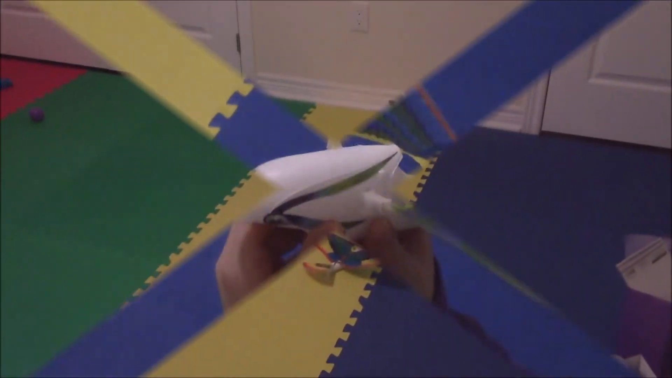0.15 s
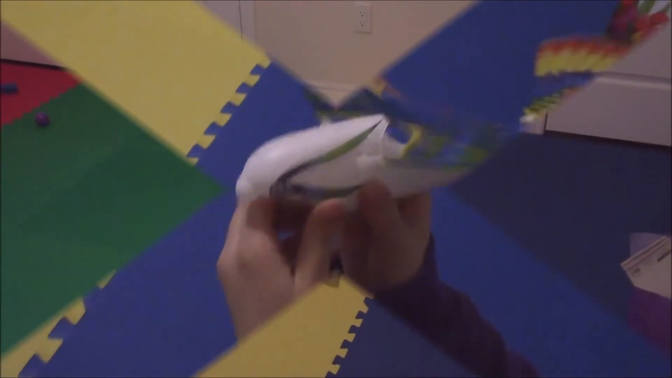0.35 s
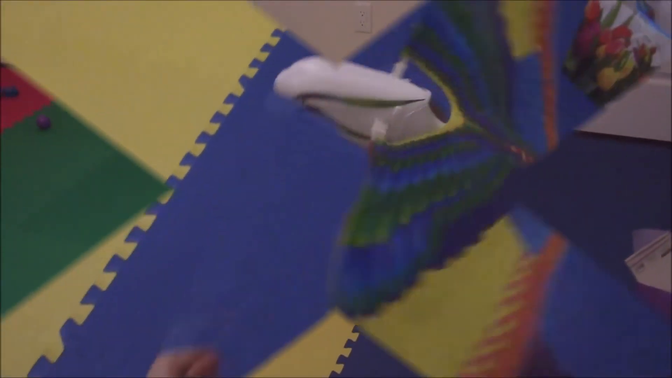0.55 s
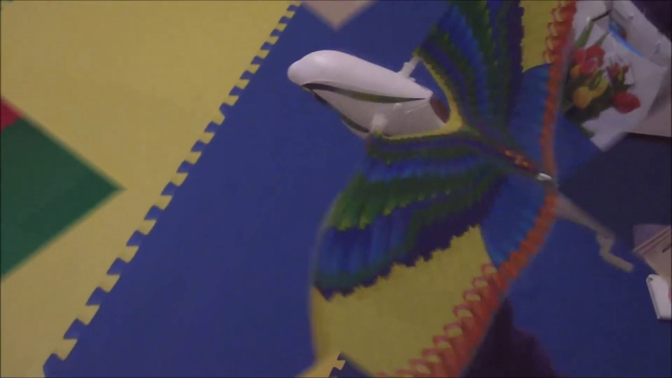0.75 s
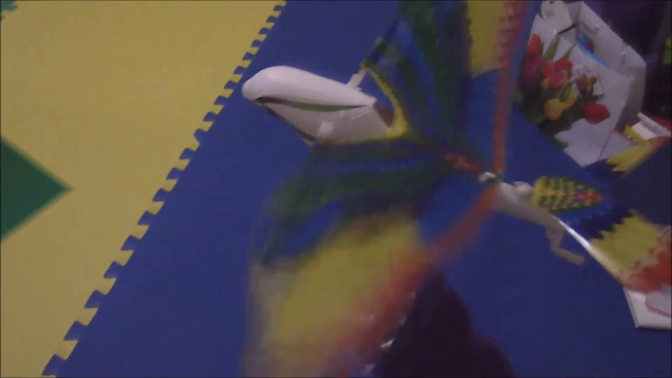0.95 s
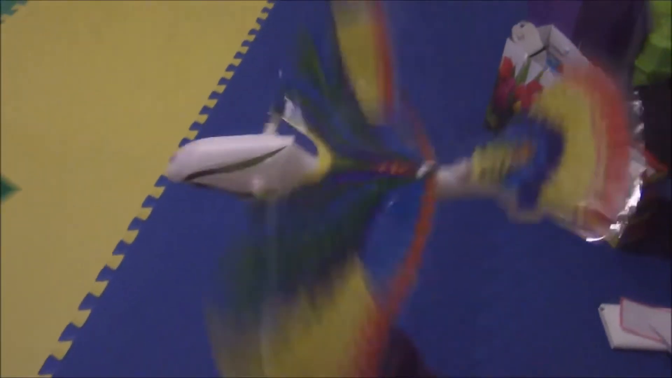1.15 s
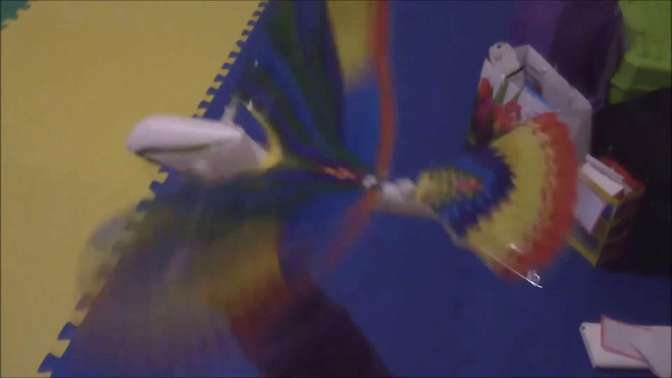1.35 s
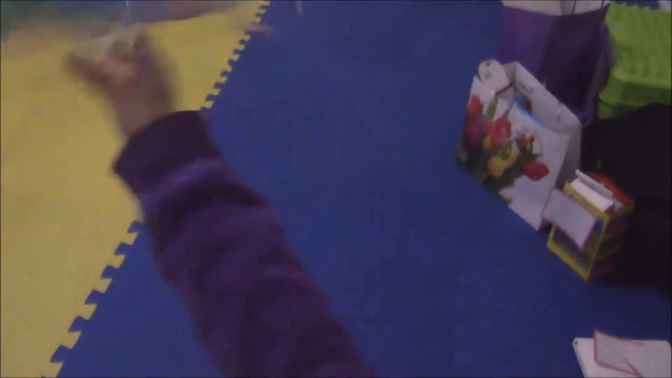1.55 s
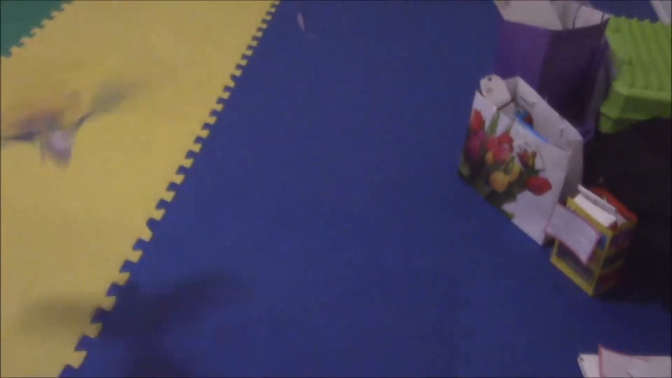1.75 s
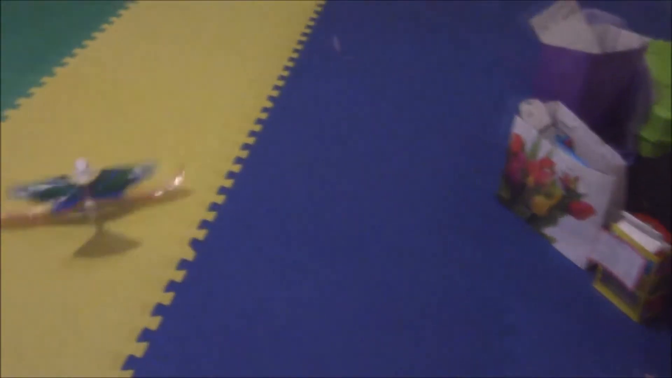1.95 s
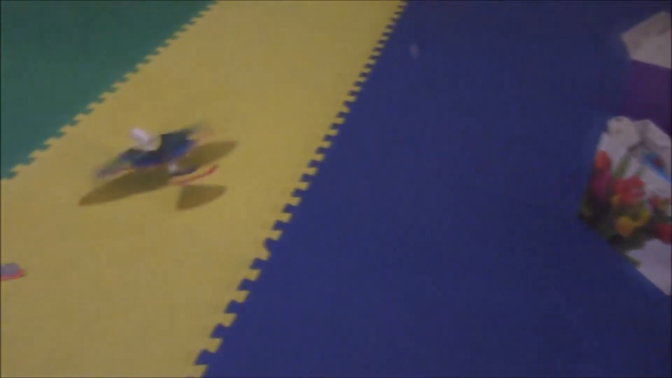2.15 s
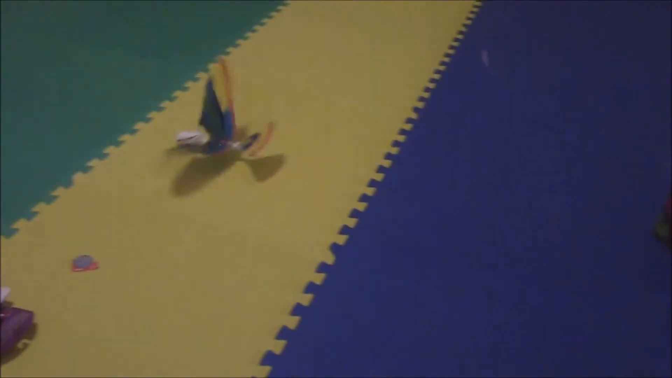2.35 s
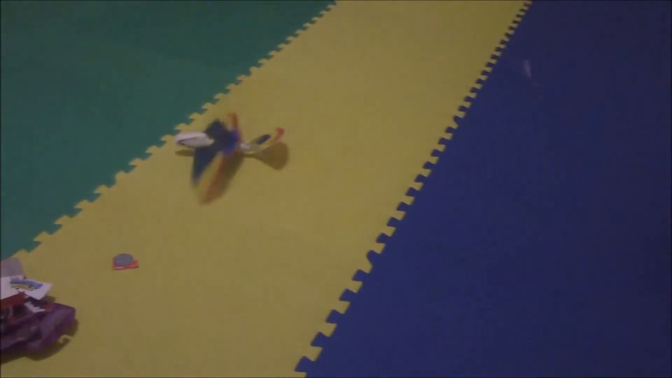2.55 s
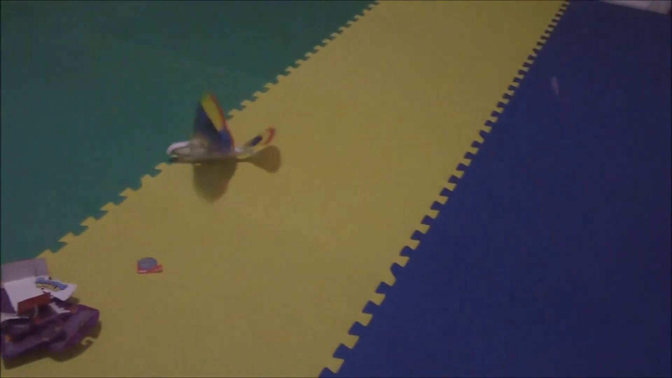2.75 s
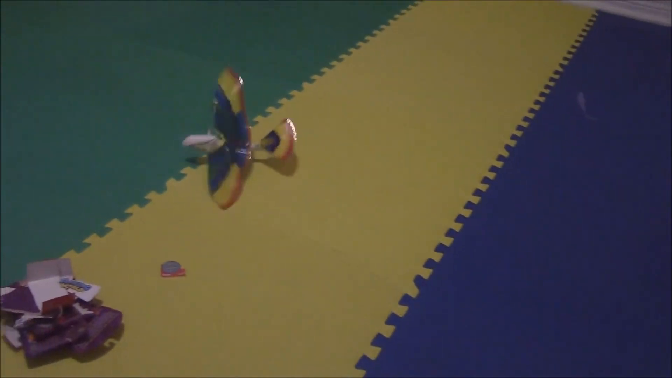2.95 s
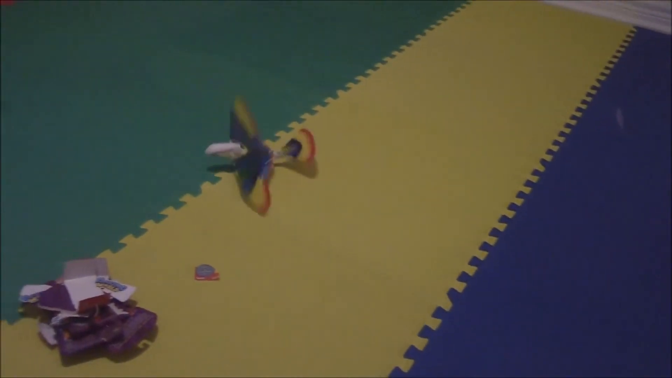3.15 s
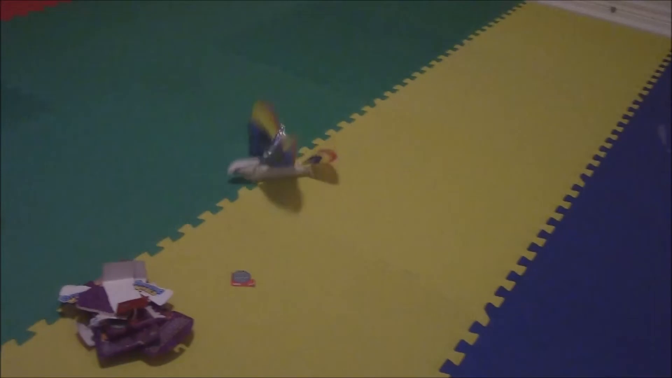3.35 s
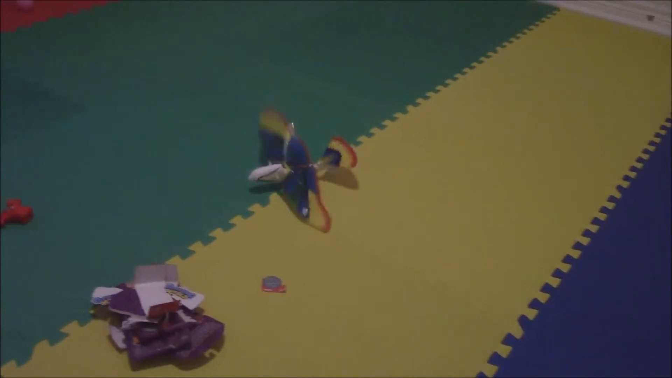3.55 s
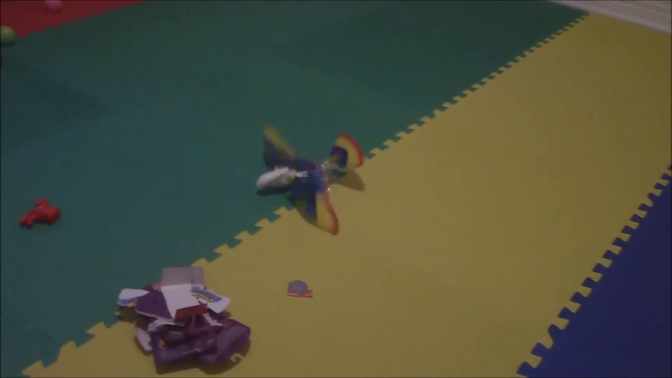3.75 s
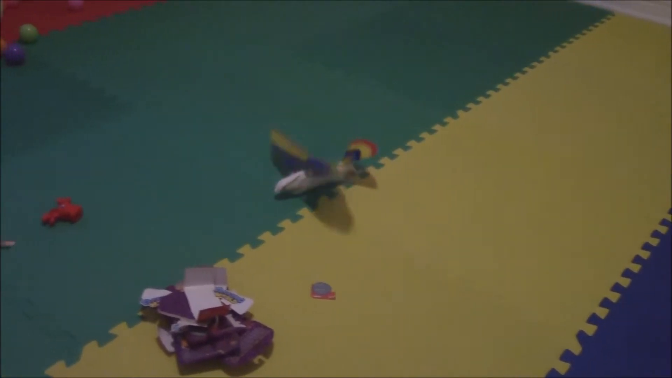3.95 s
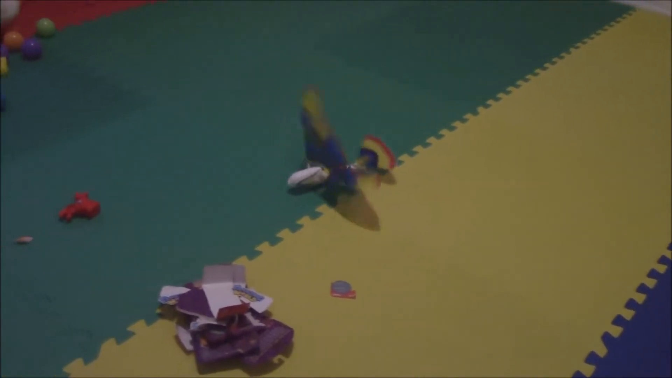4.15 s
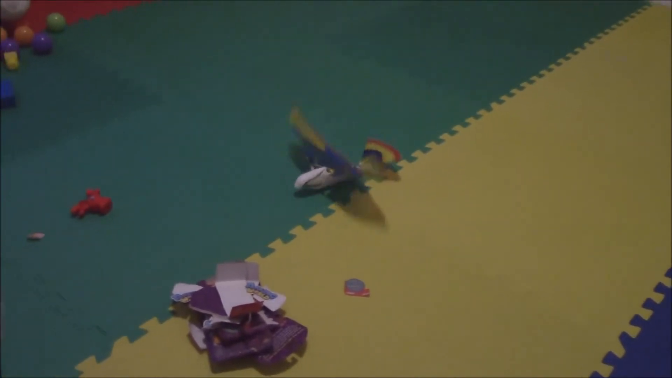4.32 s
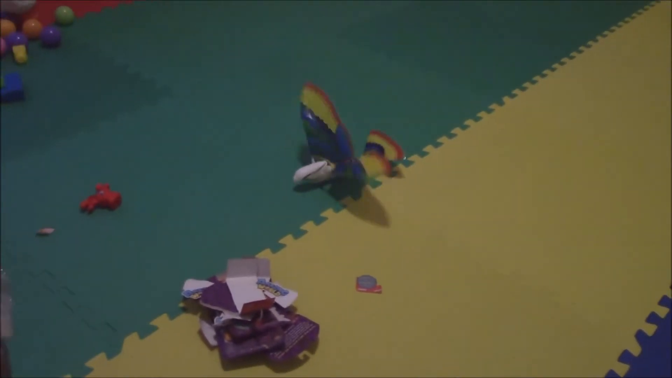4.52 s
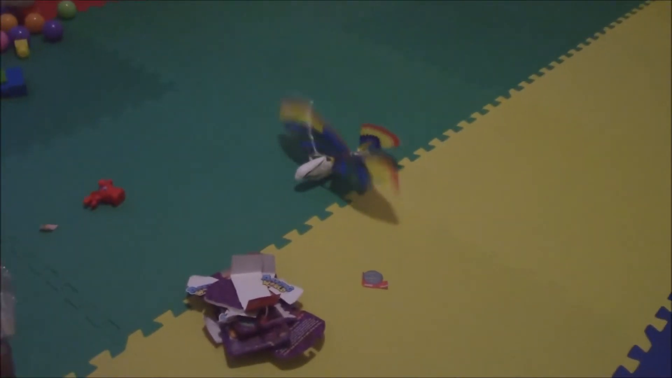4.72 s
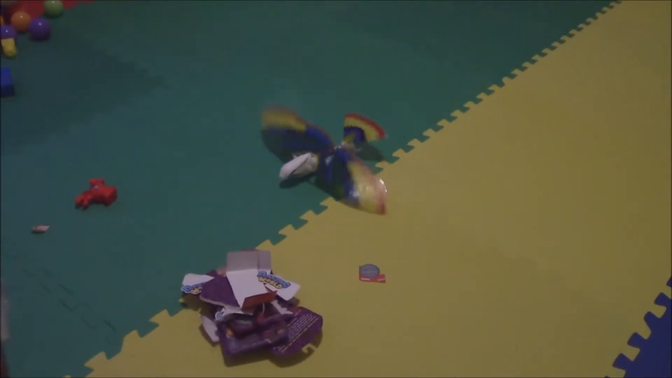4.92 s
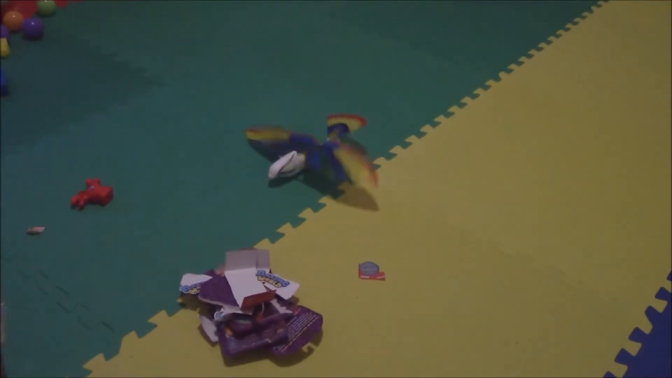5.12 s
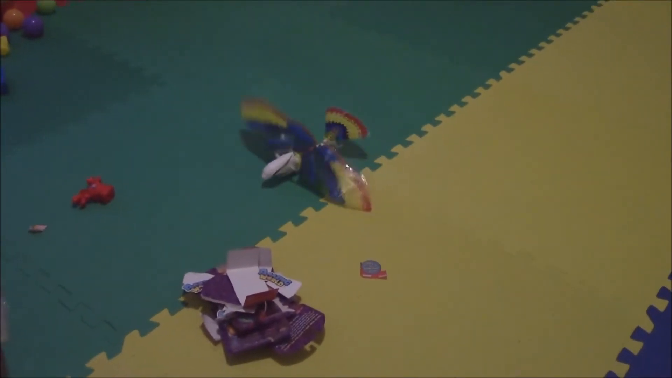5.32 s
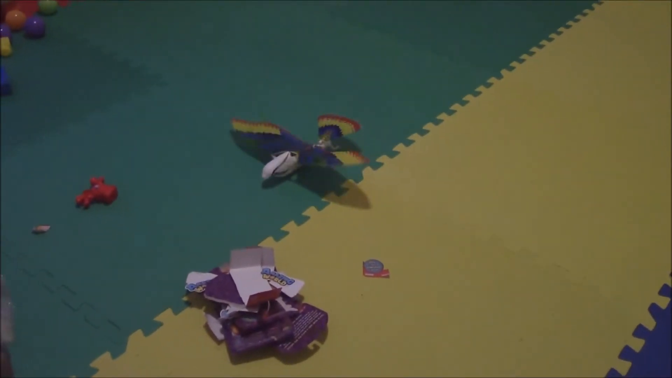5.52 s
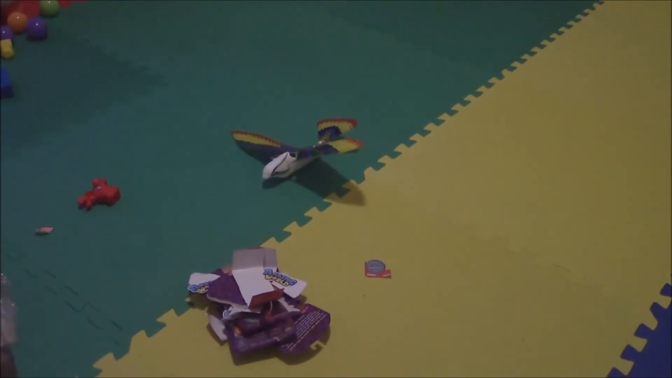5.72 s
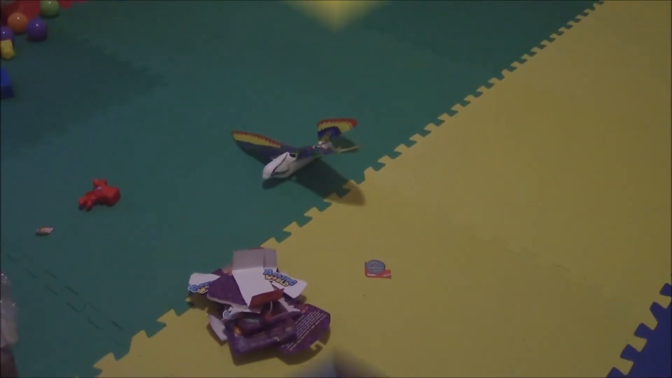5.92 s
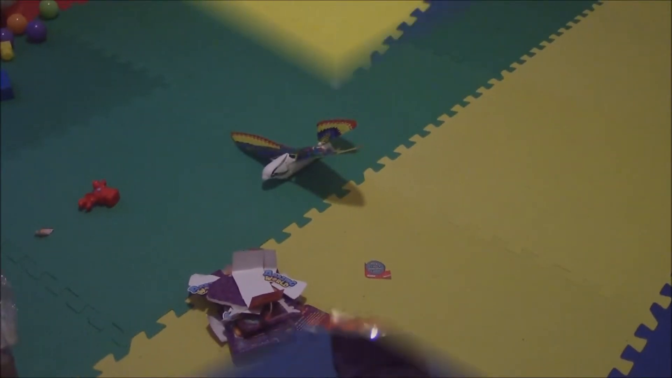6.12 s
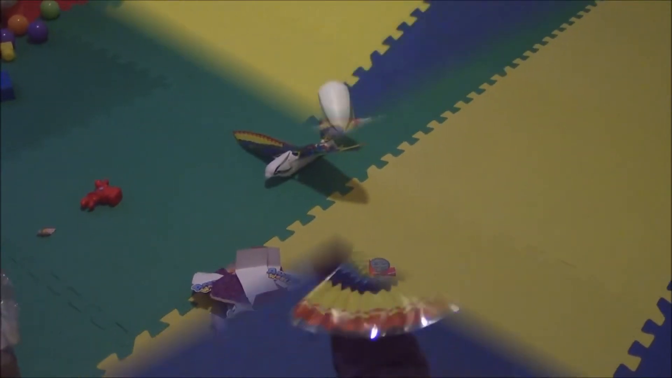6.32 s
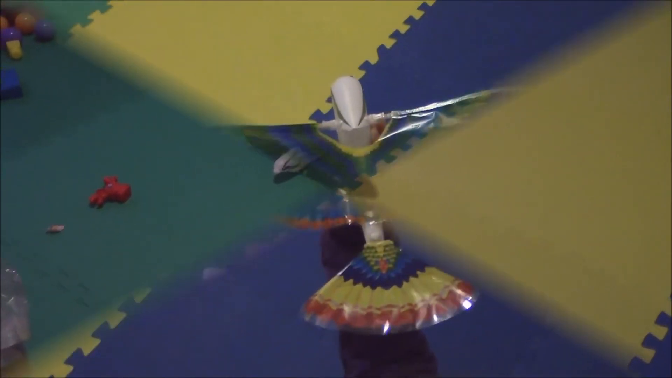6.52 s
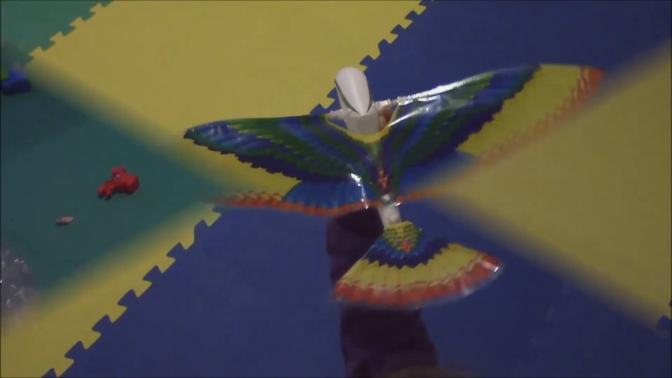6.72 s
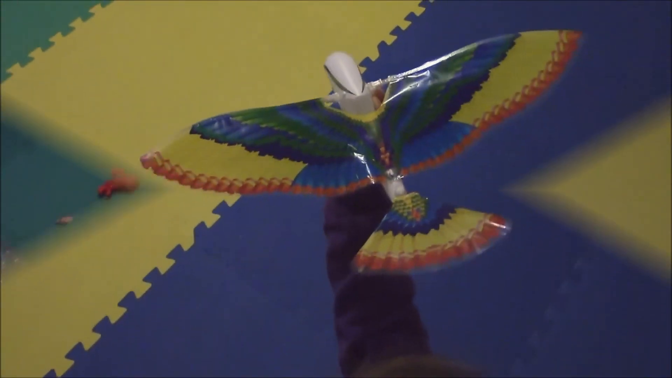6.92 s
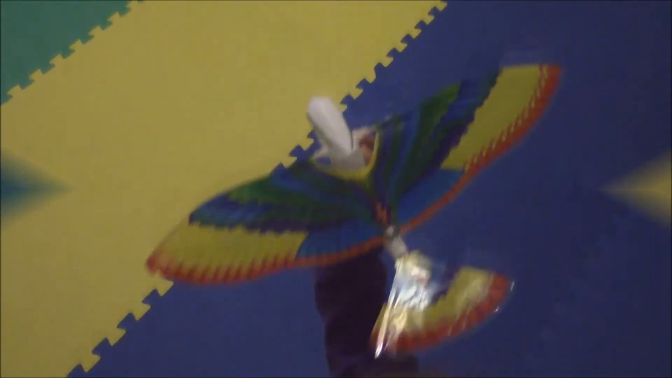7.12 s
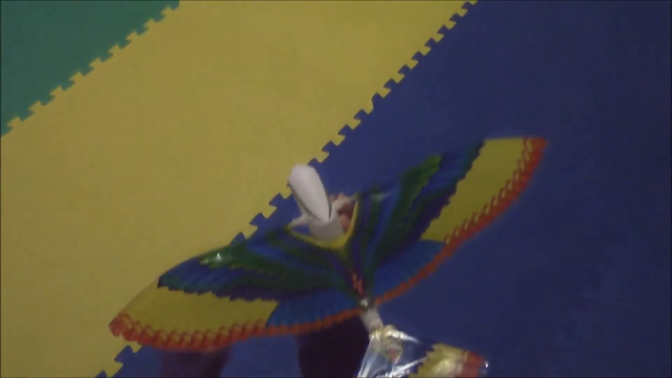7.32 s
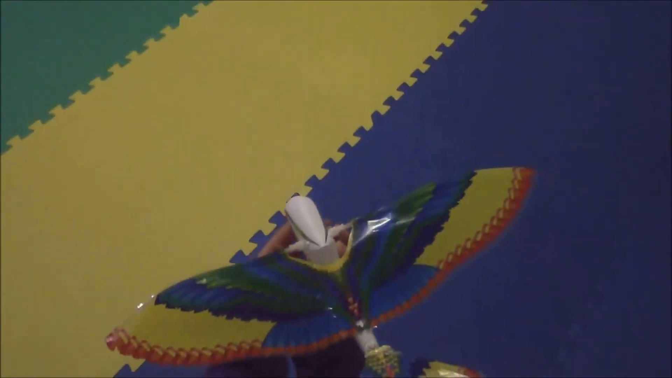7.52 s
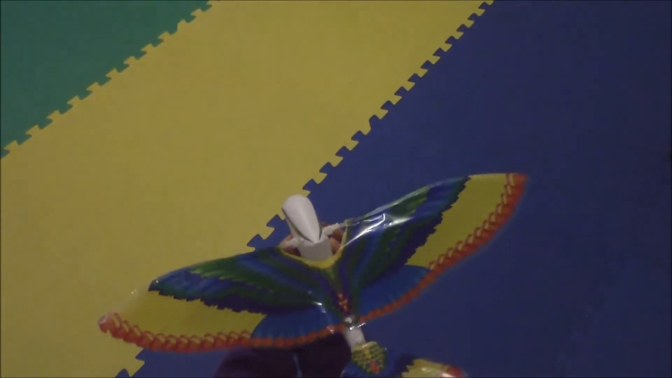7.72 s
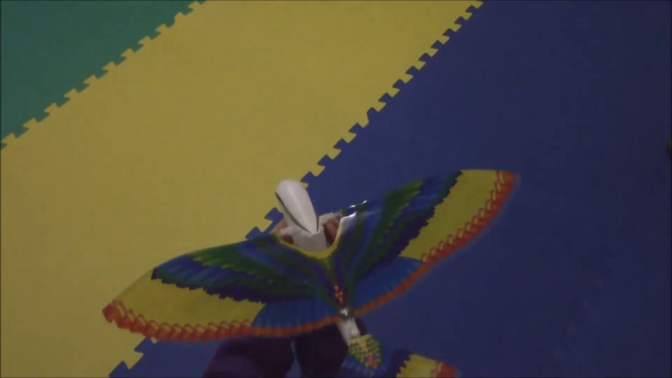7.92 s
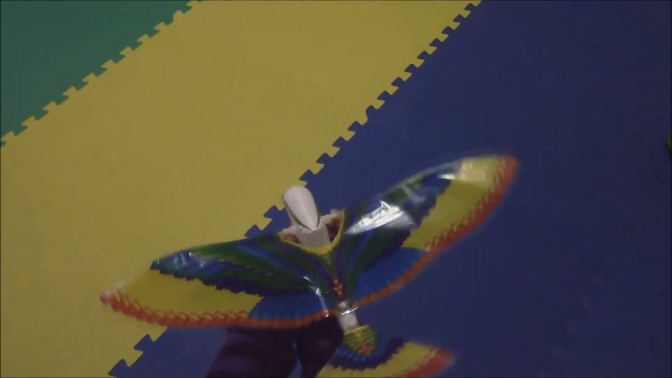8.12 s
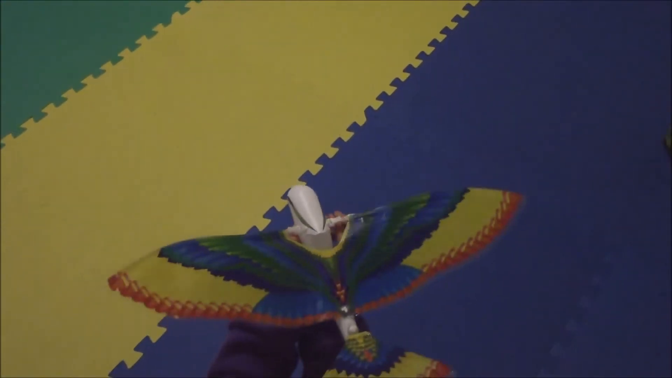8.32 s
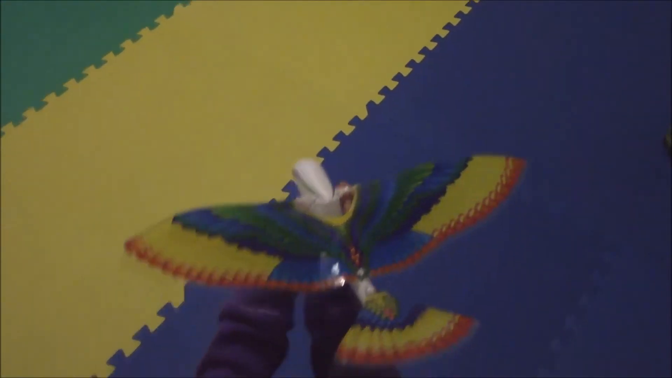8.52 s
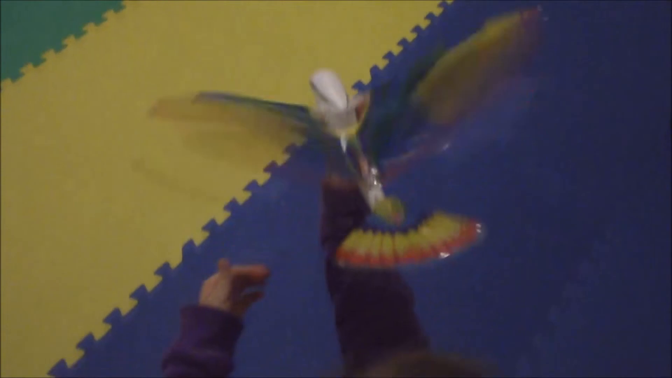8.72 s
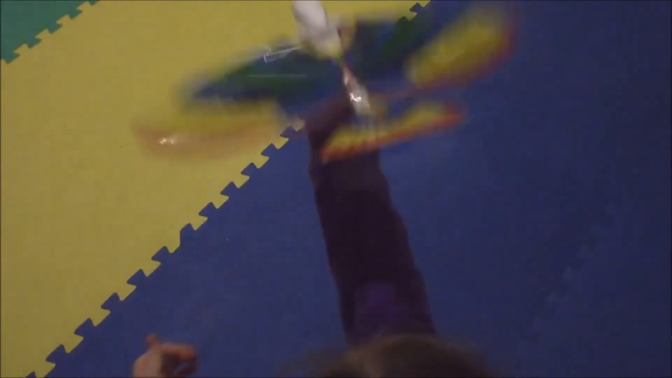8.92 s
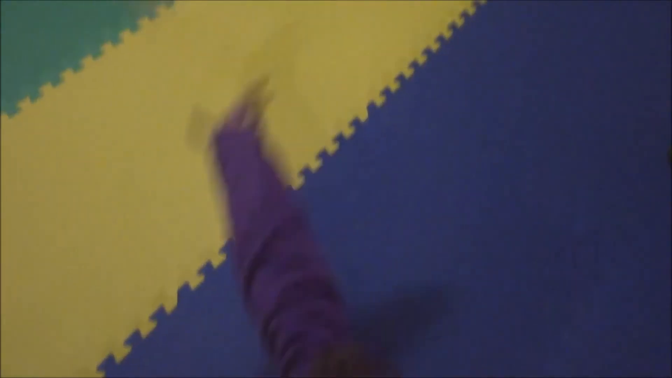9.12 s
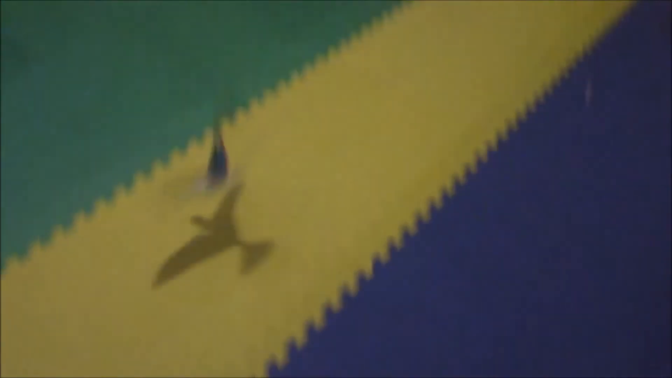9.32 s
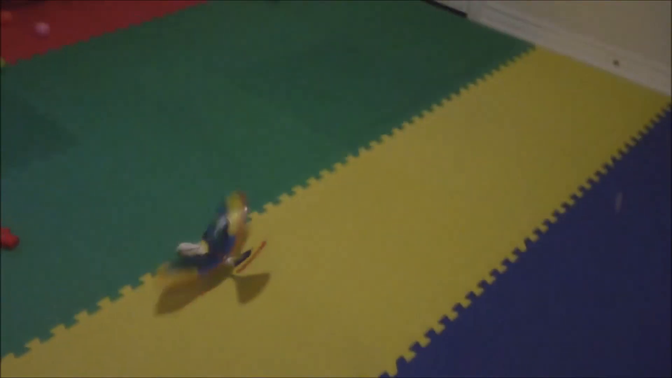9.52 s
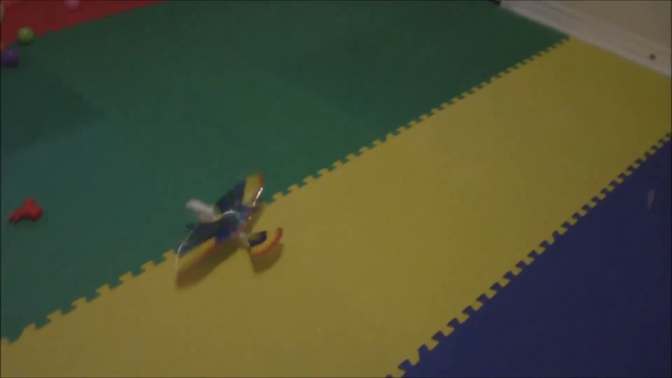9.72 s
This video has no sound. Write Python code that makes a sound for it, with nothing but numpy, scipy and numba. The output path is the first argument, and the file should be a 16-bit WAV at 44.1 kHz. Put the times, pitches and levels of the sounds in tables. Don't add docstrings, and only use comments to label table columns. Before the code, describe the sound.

Plastic film rustles in hand, then a wind-up bird's wings clatter rapidly across a foam mat, slow to a stop, and clatter again.

```python
import sys
import numpy as np
from scipy import signal
from scipy.fft import rfft, irfft
from scipy.io import wavfile
from scipy.ndimage import uniform_filter1d
from numba import njit

SR = 44100
rng = np.random.default_rng(int(sys.argv[2]) if len(sys.argv) > 2 else 0)


def how_loud(loudness_db):
    steps = np.asarray(loudness_db, float) / 20
    return 10 ** steps


def materialize(psi):
    bounded = np.clip(np.atleast_2d(psi).T, -1, 1)
    quanta = np.round(bounded * 32767).astype(np.int16)
    wavfile.write(sys.argv[1], SR, quanta)


N = 434826

# hz, level_db_per_hz
HUM_SPECTRUM = [(15, -53.5), (25, -42.5), (97, -12.5), (185, -2.5), (242, -4), (270, 0), (503, -2.5),
                (641, -3.5), (796, -9.5), (911, -10), (2500, -18), (3000, -15.5), (3500, -21), (9840, -34),
                (16000, -50)]
# start_s, level_db
HUM_LEVEL = [
    (0, -38.5),
    (1.006, -48.5),
    (6.349, -36.5),
    (8.45, -39.5),
    (8.755, -50),
]
# centre_hz, width_hz, level_db
ROOM_MODES = [(146, 11, 2), (236, 11, -1), (303, 14, -3), (354, 11, -1), (425, 11, 1)]
# hz, t60_s
ROOM_T60 = [(100, 0.3), (700, 0.95), (2400, 0.58), (4000, 0.57), (7700, 0.36), (12000, 0.1)]
# hz, side_re_mid_db
STEREO_WIDTH = [(25, 0), (70, -6), (130, -15), (250, -21.5), (600, -23.5), (1290, -20), (2380, -20),
                (4400, -11.5), (8120, -11.5), (15000, -16)]
# centre_s, level_db, spread_s
DRAUGHTS = [
    (1.15, -53, .3),
    (1.7, -64, .4),
    (8.9, -50, .15),
]
# start_s, peak_db, low_mode_db, left_re_right_db, mid_mode_db, landing_s
KNOCKS = [
    (5.913, -26, -9, -5, -1, .0007),
    (6.2628, -8.5, -12, -3, -16, .0002),
    (6.2794, -31, -1, 3, -6, .001),
    (6.5405, -11, -12, 4, -1, .0015),
    (6.5655, -16, 0, 2, -3, .0008),
]
# hz, t60_s
CASE_MODES = [(1550, .016), (2600, .011), (2100, .008), (3150, .01), (4800, .012), (330, .03)]
# start_s, length_s, level_db, pitch_hz
SCRAPES = [(.14, .16, -42, 900), (.255, .05, -43, 1300), (.39, .13, -41, 850), (.55, .14, -42, 900),
           (.55, .03, -44, 1450), (.58, .15, -41, 600), (.865, .03, -43, 950), (8.16, .06, -43, 650),
           (8.27, .15, -42, 750), (7.55, .15, -49, 1500), (8.09, .06, -46, 1700), (8.09, .07, -46, 1100)]
# peak_s, peak_db, rise_20db_s, fall_20db_s
GRIPS = [(.001, -49, .01, .4), (.39, -47, .45, .1), (.418, -31, .025, .1), (.452, -35, .03, .04),
         (.49, -37, .05, .08), (.623, -38, .03, .04), (.655, -33, .06, .03), (.675, -22, .008, .012),
         (.692, -35, .01, .02), (.73, -39, .03, .06), (.81, -45, .018, .12), (6.36, -54, .005, .6),
         (6.6, -54, .03, .55), (7.15, -40.5, .016, .21), (7.35, -43, .011, .08), (7.45, -54, .03, .3),
         (7.93, -42, .15, .09), (8.18, -42, .07, .05), (8.27, -28.5, .045, .08), (8.38, -29, .045, .04),
         (8.415, -33, .03, .05), (8.525, -42, .03, .05), (8.495, -35, .01, .04), (8.62, -40, .013, .016)]
# start_s, end_s, level_db
RESTING = [
    (0, 1, -62),
    (5.62, 5.8, -64),
    (6.35, 8.745, -65),
]
# start_s, peak_db, pitch_hz, fizz_db
TICKS = [(0.0682, -29.5, 2900, -13), (0.159, -24, 1900, -18), (0.2114, -35, 2990, -9.5),
         (0.2384, -28, 3980, -6), (0.2648, -29.5, 3330, -18), (0.2937, -32, 2220, -6),
         (0.3356, -32, 2160, -14), (0.3975, -13, 1520, -18), (0.4184, -21, 2880, 2),
         (0.4489, -15, 7060, -12), (0.4748, -22, 2880, -9), (0.5821, -36.5, 3970, -16),
         (0.5931, -27.5, 2960, -7.5), (0.6205, -22, 3550, -14.5), (0.6414, -22, 3600, -9.5),
         (0.6724, -13.5, 7560, -5), (0.7312, -23.5, 3030, -12), (0.8126, -24.5, 2870, -6),
         (0.8579, -24.5, 2880, -17.5), (0.9353, -37, 1800, -9.5), (0.9547, -34, 3100, -14),
         (0.9737, -50.5, 8000, 14.5)]
# start_s, peak_db, pitch_hz, fizz_db
LATE_TICKS = [(6.5878, -31, 1570, -7), (7.0692, -39, 3340, -16), (7.1453, -38, 1830, -15),
              (7.159, -21, 2010, -16), (7.2513, -35, 1730, -21), (7.2942, -28, 3350, -18),
              (7.3488, -37, 1730, -13), (7.3715, -26, 2650, -13), (7.4534, -33, 2940, -13),
              (7.5174, -31, 1600, -15), (7.596, -28, 1610, -16), (7.7911, -35, 2130, -9),
              (7.8654, -29, 1530, -8), (7.9116, -39, 1580, -9), (7.9273, -31, 2610, 0),
              (7.9807, -32, 1590, -7), (8.1652, -33, 1860, -15), (8.2411, -31, 2860, -12),
              (8.265, -18.5, 3500, -13.5), (8.334, -28, 2100, -9), (8.4082, -30, 2310, -11),
              (8.4944, -18, 6610, -15), (8.558, -30, 3630, -21), (8.6215, -33, 1850, -3)]
# start_s, peak_db, pitch_hz, fizz_db
SETTLE_TICKS = [
    (5.648, -46, 9000, 6),
    (5.685, -58, 9000, 5),
    (5.722, -53, 7000, 5),
    (5.76, -56, 7000, 3),
    (5.906, -58, 9000, 5),
]
# start_s, snap_db, pitch_hz
BOUNCES = [(1.0062, -4, 7800), (1.0103, 0, 1950), (1.04, -8, 3000), (1.2, -9, 2000), (1.676, -8, 3000),
           (2.626, -10, 2200), (8.819, -6, 2500), (8.863, -8, 3000), (9.053, -11, 1660), (9.4142, -4, 1690),
           (9.434, -6, 2500), (9.551, -7, 1800), (9.6236, -1, 1870), (9.757, -5, 1600)]
# start_s, snap_db, pitch_hz
HELD = [(1.0068, 4.5, 2860), (1.0284, 2.5, 3650), (1.0605, 3.5, 2790), (1.0982, -1, 3300), (1.138, 2, 2340),
        (1.1819, 1, 2960), (1.225, 3.5, 2030), (1.2699, 2, 3200), (1.3144, 0, 2360), (1.3644, 4.5, 3170),
        (1.414, 3.5, 1970), (1.4642, 2.5, 3160), (1.52, 2.5, 2100), (1.568, 2, 2080), (1.6192, 3, 3180)]
HELD_DOWN, HELD_UP = HELD[::2], HELD[1::2]
# start_s, snap_db, pitch_hz
GLIDE = [(1.6702, -7, 1500), (1.7168, -4.5, 1960), (1.7737, -4.5, 1950), (1.816, -5, 1750),
         (1.8758, -7, 1520), (1.9182, -6, 1540), (1.9846, -5, 1780), (2.0433, -7, 2840), (2.0993, -4, 1960),
         (2.1605, -4, 2300), (2.219, -13, 1710), (2.286, -2.5, 1970), (2.3406, -7.5, 2200)]
# start_s, snap_db, pitch_hz
DOWN = [(2.4087, 1.5, 1900), (2.5447, -8.5, 1910), (2.6819, -1, 2180), (2.822, .6, 1900),
        (2.9661, -1.5, 2000), (3.111, .6, 1760), (3.2449, 3, 2080), (3.3887, -3, 1840), (3.5369, 2.5, 2050),
        (3.7027, -6, 2060), (3.8595, 0, 1990), (4.0325, -2, 2180), (4.211, 2, 1780), (4.39, -6, 1640),
        (4.5574, -1, 2040), (4.7294, -4, 2040), (4.905, -3.5, 1560), (5.0958, -16, 1510),
        (5.2967, -3, 1550)]
# start_s, snap_db, pitch_hz
UP = [(2.484, -13, 1750), (2.6178, -12.5, 1670), (2.7561, -20, 1960), (2.9007, -7, 1800),
      (3.0441, -12, 1910), (3.185, -11.5, 1530), (3.328, -7, 1530), (3.4683, -12, 2210), (3.6323, -7, 2080),
      (3.794, -15, 1500), (3.9556, -5, 1540), (4.14, -5, 2600), (4.3175, -3, 2600), (4.479, -6, 1480),
      (4.656, -2, 1500), (4.8137, -4.5, 1540), (4.999, -6, 1470), (5.2123, -12.5, 1500),
      (5.4165, -15.5, 2010)]
# start_s, snap_db, pitch_hz
DOWN_2 = [(8.7552, 3, 4500), (8.8972, 4.5, 3170), (9.0267, 6.5, 2310), (9.136, .6, 2310),
          (9.2442, 2.5, 2800), (9.3529, 4, 1880), (9.4827, 3, 1910), (9.6024, 4, 1940), (9.7321, 8, 1710)]
# start_s, snap_db, pitch_hz
UP_2 = [(8.7750, 6, 2400), (8.831, 3, 1960), (8.9564, -.6, 3670), (9.0738, 2, 1550), (9.1929, .6, 1500),
        (9.306, 3, 1510), (9.428, -11, 1770), (9.5355, 2, 2320), (9.6702, 1.5, 2600), (9.8009, 3.5, 2283)]
# strokes, slap_db, fizz_db, room_send_db, lead_crackle_db
STROKES = [
    (HELD_DOWN, -9, -5.5, 0, -23),
    (HELD_UP, -12, -6, -.5, -9.5),
    (GLIDE, -8, -17.5, -1.5, -24),
    (DOWN, -13, -16.5, -3.5, -27),
    (UP, -13, -15.5, -4.5, -22),
    (DOWN_2, -14, -12, -1.5, -19),
    (UP_2, -13, -9.5, -1.5, -16),
    (BOUNCES, -3, -19, -6, -40),
]
# time_s, level_db, nearness_0_to_1
FLIGHTS = [
    [(1.08, -18.5, .62), (1.32, -30, .96), (1.6, -27.5, .8), (1.9, -20, .25), (2.5, -20, .28),
     (3.2, -18.5, .2), (4, -18, .18), (4.8, -17, .18), (5.45, -19.5, .1)],
    [(8.8, -21, .85), (9.0, -16.5, .66), (9.25, -16, .68), (9.38, -15.5, .56), (9.46, -15, .72),
     (9.53, -14, .55), (9.6, -13, .5), (9.86, -12.5, .2)],
]
# hz, level_db_per_hz
FILM_COLOUR = [(35, -86), (60, -52), (98, -50.5), (133, -16.5), (250, -9.5), (354, -7.5), (520, -4),
               (651, -3), (822, 1.5), (903, 1), (1280, -4.5), (1470, -3.5), (4220, -14.5), (10800, -18.5),
               (12700, -23), (16000, -35.5)]
# time_s, low_hz, up_hz, low_db, up_db, third_db
SHELL = [
    [(1.1, 820, 1000, 1, 4, 2), (1.5, 687, 920, -2, -2, 0), (1.9, 740, 905, 1, 7, 4),
     (2.25, 725, 910, 2, 5, 3), (2.6, 714, 940, 5, 1, 0), (3.0, 695, 915, 7, 4, 0),
     (3.4, 665, 900, 7, 9, 2), (3.9, 653, 907, 7, 8, 0), (4.1, 640, 1000, 1, 2, 2),
     (4.4, 650, 990, 2, 0, 3), (4.75, 760, 980, 1, 4, 5), (5.1, 740, 960, 1, 2, 3),
     (5.4, 700, 987, 2, 5, 3)],
    [(8.8, 683, 1020, 0, 5, 0), (9.05, 720, 1020, 0, 2, 2), (9.3, 750, 1020, -3, -3, 3),
     (9.42, 780, 900, 2, 1, 1), (9.5, 800, 950, 4, 2, 3), (9.57, 760, 1000, 0, 2, 1),
     (9.635, 735, 1010, 10, 2, 3), (9.7, 720, 1030, 3, 6, 5), (9.765, 740, 1020, 9, 2, 4),
     (9.82, 720, 1040, 2, 6, 6), (9.86, 720, 1040, 2, 3, 4)],
]
SHELL_WIDTHS = (44, 50, 80)
# pitch_hz, level_db
THIRD_RING = (1422, -3.6)

GAIN_OVERSHOOT_DB, GAIN_SETTLE_S = 2.2, .25
SCRAPE_WIDTH_SHARE, STUTTER_DB = .25, 4
DULL_EVEN_DB, DULL_SLOPE = -36, .45
SLAP_SHARE, SLAP_BASE_HZ = .17, 260
THUD_HZ, THUD_DB, THUD_S = 260, -14, .012
LEAD_S, SNAP_RISE_S = .011, .0002
TAIL_DB, TAIL_S, TAIL_LAG_S = -14, .015, .003
ECHO_BUILD_S, STRUCK_DB = .005, -9
TREBLE_FAR_DB, TREBLE_NEAR_GAIN_DB = 8, 15
AIR_FAR_DB, AIR_NEAR_GAIN_DB = -12, 35
LOW_RING_DB, UP_RING_DB = 2, 0
ROCK_RATE_HZ, ROCK_SWELL_DB, ROCK_PITCH_SHARE = 16, 2.1, .011
SIDE_NEAR_DB = -6


def unit(x):
    return x / np.sqrt(np.mean(x ** 2))


def on_log(hz, table):
    f, v = np.transpose(table)
    return np.interp(np.log(np.maximum(hz, 1)), np.log(f), v)


def colour(x, table):
    gain = how_loud(on_log(np.fft.rfftfreq(4096, 1 / SR), table))
    cepstrum = irfft(np.log(gain))
    cepstrum[1:2048] *= 2
    cepstrum[2049:] = 0
    response = irfft(np.exp(rfft(cepstrum)))[:2048]
    return signal.fftconvolve(x, response)[:len(x)]


def band(x, lo_hz, hi_hz):
    sos = signal.butter(2, [lo_hz, min(hi_hz, .45 * SR)], "band", fs=SR, output="sos")
    return signal.sosfilt(sos, x)


def curves(tables):
    t = np.arange(N) / SR
    on = sum((t >= c[0][0]) & (t <= c[-1][0] + .02) for c in tables)
    s, *cols = np.transpose(np.vstack(tables))
    return on, [np.interp(t, s, c) for c in cols]


def add(out, s, x):
    i = int(s * SR)
    out[i:i + len(x)] += x[:N - i]


@njit
def ring(x, hz, width):
    y, b, l = np.empty(len(x)), 0., 0.
    for i in range(len(x)):
        g, k = np.tan(np.pi * hz[i] / SR), width / hz[i]
        v = (b + g * (x[i] - l)) / (1 + g * (g + k))
        b, l, y[i] = 2 * v - b, l + 2 * g * v, k * v
    return y


def standing(x):
    return x + sum(how_loud(db) * ring(x, np.full(N, 1. * hz), 1. * width) for hz, width, db in ROOM_MODES)


def hum():
    waver = unit(uniform_filter1d(rng.standard_normal(N), 3000))
    t, (s, db) = np.arange(N) / SR, np.transpose(HUM_LEVEL)
    step = np.searchsorted(s, t, "right") - 1
    gain_db = db[step] + GAIN_OVERSHOOT_DB * np.exp(-(t - s[step]) / GAIN_SETTLE_S)
    noise = colour(rng.standard_normal(N), HUM_SPECTRUM)
    return unit(standing(noise)) * how_loud(gain_db + .8 * waver)


def room(x):
    out, noise = np.zeros((2, N)), rng.standard_normal((2, N))
    late = np.exp(-1 / (ECHO_BUILD_S * SR))
    gathered = signal.lfilter([1 - late], [1, -late], x ** 2 + 1e-18)
    for f in 60 * 2. ** np.arange(9):
        keep = np.exp(-2 * np.log(1000) / (on_log(f, ROOM_T60) * SR))
        energy = signal.lfilter([1 - keep], [1, -keep], gathered)
        out += np.sqrt(energy) * band(np.roll(noise, int(20 * f), axis=1), f, 2 * f)
    return out


def draught():
    t = np.arange(N) / SR
    flapping = t % 7.75 > 1.006
    puffs = sum(how_loud(db) * np.exp(-((t - s) / spread) ** 2) * flapping for s, db, spread in DRAUGHTS)
    return unit(band(rng.standard_normal(N), 30, 100)) * puffs


def knocks():
    out, t = np.zeros((2, N)), np.arange(2000) / SR
    for s, db, low_db, pan_db, mid_db, land_s in KNOCKS:
        mode_db = (low_db + 3.5, -3, mid_db, -14, -12, -17 + 8 * (land_s > .0005))
        modes = sum(how_loud(d) * np.sin(2 * np.pi * f * t) * np.exp(-np.log(1000) * t / t60)
                    for (f, t60), d in zip(CASE_MODES, mode_db))
        rub = unit(band(rng.standard_normal(len(t)), 500, 6000)) * np.exp(-t / 0.0019)
        landing = (1 - np.exp(-t / land_s)) ** 2
        tap = band((modes + 0.3 * rub) * landing, 200, 5000 * (.001 / land_s) ** .3)
        add(out[0], s, how_loud(db + 4 + pan_db / 2) * tap)
        add(out[1], s, how_loud(db + 4.5 - pan_db / 2) * tap)
    return out


def crinkle(size, rate, spread_db):
    where, big, sign = rng.random(size), rng.exponential(1, size), rng.standard_normal(size)
    clicks = (where < rate / SR) * how_loud(spread_db * np.minimum(big, 3))
    fizz = signal.lfilter([1], [1, -np.exp(-1 / (0.00059 * SR))], clicks)
    return unit((fizz + 0.3) * sign)


def scrapes():
    out, t = np.zeros(N), np.arange(int(.25 * SR)) / SR
    for s, length, db, hz in SCRAPES:
        slips = crinkle(len(t), rate=120, spread_db=STUTTER_DB)
        rasp = ring(slips, np.full(len(t), 1. * hz), SCRAPE_WIDTH_SHARE * hz)
        swell = np.sqrt(np.sin(np.pi * np.minimum(t / length, 1)).clip(0))
        add(out, s, how_loud(db) * unit(rasp) * swell)
    return out


def snap(hz, fizz_db, ring_s, crack_s, rustle):
    t = np.arange(2500) / SR
    a, b = rng.standard_normal((2, len(t)))
    click = np.sin(2 * np.pi * hz * t) * np.exp(-t / .0006)
    rough = 0.67 * unit(band(a, hz / 1.9, hz * 1.8)) * np.exp(-t / ring_s)
    crack = unit(band(b, 6700, 12900)) * (np.exp(-t / crack_s) + rustle * np.exp(-t / 0.019))
    return 1.8 * click + rough + 0.79 * how_loud(fizz_db) * crack


def hands():
    t = np.arange(0, N, 32) / SR
    touch = sum(how_loud(db) * ((t >= a) & (t < b)) for a, b, db in RESTING)
    for s, db, rise, fall in GRIPS:
        touch = touch + how_loud(db - 20 * np.maximum((s - t) / rise, (t - s) / fall))
    touch = np.interp(np.arange(N) / SR, t, touch)
    bright = unit(band(crinkle(N, rate=900, spread_db=1.5), 3500, 8700))
    dull = unit(band(crinkle(N, rate=1200, spread_db=1), 600, 3600))
    dull_touch = touch ** (1 - DULL_SLOPE) * how_loud(DULL_SLOPE * DULL_EVEN_DB) * (touch > 1e-4)
    out = touch * bright + dull_touch * dull
    for s, db, hz, fizz_db in list(TICKS) + list(SETTLE_TICKS) + list(LATE_TICKS):
        add(out, s, how_loud(db - 4) * snap(hz, fizz_db + 13.5, ring_s=.0015, crack_s=.0011, rustle=.05))
    return out


def rock():
    slow = uniform_filter1d(rng.standard_normal(N), int(SR / ROCK_RATE_HZ))
    return unit(uniform_filter1d(slow, int(SR / ROCK_RATE_HZ / 2)))


def flight(x, struck=0):
    on, (body_db, nearness) = curves(FLIGHTS)
    treble_db = TREBLE_FAR_DB + TREBLE_NEAR_GAIN_DB * nearness ** 4
    air_db = AIR_FAR_DB + AIR_NEAR_GAIN_DB * nearness
    x, struck = colour(x, FILM_COLOUR), colour(x + struck, FILM_COLOUR)
    _, (low_hz, up_hz, low_db, up_db, third_db) = curves(SHELL)
    third_hz = np.full(N, 1. * THIRD_RING[0])
    levels_db = (low_db + LOW_RING_DB, up_db + UP_RING_DB, third_db - 2 + THIRD_RING[1])
    shell = 0
    for hz, db, width in zip((low_hz, up_hz, third_hz), levels_db, SHELL_WIDTHS):
        swell = how_loud(db + ROCK_SWELL_DB * rock())
        shell = shell + swell * ring(struck, hz * (1 + ROCK_PITCH_SHARE * rock()), 1. * width)
    x = unit(standing(x + shell)) * np.sqrt(np.mean(on))
    air = signal.lfilter(*signal.butter(1, 300, fs=SR), x)
    treble = signal.lfilter(*signal.butter(1, 3000, "high", fs=SR), x)
    return how_loud(body_db) * (x + air * (how_loud(air_db) - 1) + treble * (how_loud(treble_db) - 1))


def wings():
    near, feed = 1e-9 * rng.standard_normal((2, N))
    tense, thuds = np.zeros((2, N))
    beats = np.array(sorted((*row, *kind) for rows, *kind in STROKES for row in rows))
    gaps = np.clip(np.gradient(beats[:, 0]), .03, .11)
    befores = np.diff(beats[:, 0], prepend=0)
    t = np.arange(4000) / SR
    ts = t[:2500]
    for beat, gap, before in zip(beats, gaps, befores):
        s, db, hz, slap_db, fizz_db, send_db, lead_db = beat
        ragged = unit(ring(crinkle(2500, rate=600, spread_db=4), np.full(2500, 1.15 * hz), .8 * hz))
        tail = ragged * np.exp(-ts / TAIL_S) * (1 - np.exp(-ts / TAIL_LAG_S))
        crack = snap(hz, fizz_db - db + 6, ring_s=.0023, crack_s=.002, rustle=.25) + how_loud(TAIL_DB) * tail
        add(near, s, how_loud(db - 1.3) * crack * (1 - np.exp(-ts / SNAP_RISE_S)))
        slap_hz = (SLAP_BASE_HZ + SLAP_SHARE * hz) * (1 + 0.1 * rng.standard_normal())
        slap = np.sin(2 * np.pi * slap_hz * t) * np.exp(-t / 0.002)
        add(near, s + 0.0011, how_loud(db + slap_db + 5.5) * slap)
        thud_hz = THUD_HZ * (1 + .15 * rng.standard_normal())
        thud = np.sin(2 * np.pi * thud_hz * t) * np.exp(-t / THUD_S)
        add(thuds, s, how_loud(db + slap_db + THUD_DB) * thud)
        swell = 1.04 * np.exp(-t / 0.017) * (1 - np.exp(-t / .004))
        shake = crinkle(len(t), rate=900, spread_db=2.5) * (.7 * np.exp(-t / 0.0015) + swell)
        add(feed, s, how_loud(send_db) * np.sqrt(gap * 1.5) * unit(shake) / 1.5)
        lead = (1 - np.exp(-t / .002)) * np.exp(-t / LEAD_S) * (t < before)
        add(tense, s - t[-1], how_loud(lead_db) * lead[::-1] * (before < .3))
    near += tense * unit(band(crinkle(N, rate=700, spread_db=3.5), 2500, 15000))
    direct = band(band(near, 130, 19000), 280, 15000)
    return direct + band(band(thuds, 170, 450), 150, 900), feed


def scene():
    near, feed = wings()
    echoes, fingers = room(feed), hands() + scrapes()
    t = np.arange(SR // 4) / SR
    faint = [how_loud(-41.5) * signal.fftconvolve(fingers, n * np.exp(-t / 0.048))[:N]
             for n in rng.standard_normal((2, len(t)))]
    bird = near + flight(how_loud(-7.5) * band(feed, 150, 16000) + echoes[0], how_loud(STRUCK_DB) * feed)
    mid = bird + draught() + fingers + faint[0] + hum()
    apart = how_loud(SIDE_NEAR_DB * curves(FLIGHTS)[1][1])
    bird_side = apart * (flight(echoes[1]) + .5 * np.roll(near, 40))
    hand_side = faint[1] + .5 * np.roll(fingers, 40)
    side = colour(bird_side + hand_side + how_loud(6) * hum(), STEREO_WIDTH)
    return np.array([mid + side, mid - side]) + knocks()


def roll_off(x):
    return signal.sosfilt(signal.butter(12, 15850, fs=SR, output="sos"), x)


def record(dry):
    top = signal.ellip(8, .2, 70, 16000, fs=SR, output="sos")
    soft = dry * .685
    bent = np.tanh(dry / 1.344) * 0.92 - soft
    rounding = signal.lfilter(*signal.butter(2, 48, "high", fs=SR), bent)
    mix = signal.sosfilt(top, soft + rounding)
    return roll_off(mix)


dry = scene()
out = record(dry)
materialize(out)
```